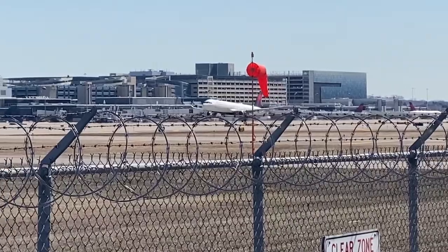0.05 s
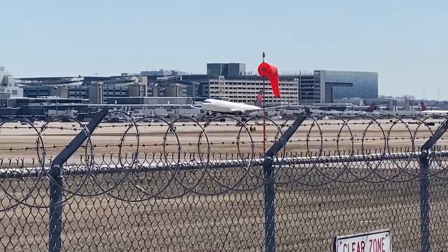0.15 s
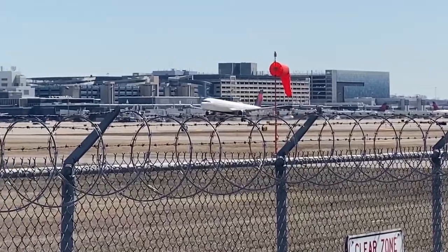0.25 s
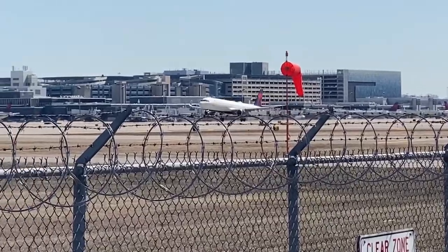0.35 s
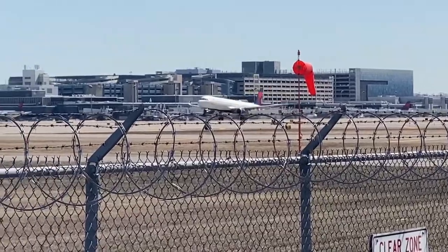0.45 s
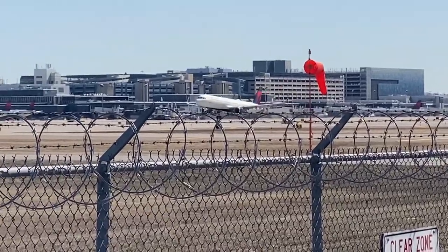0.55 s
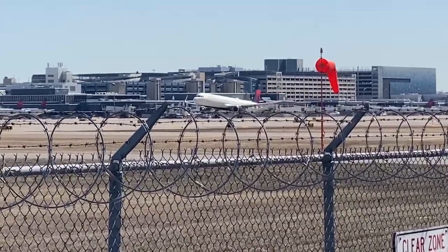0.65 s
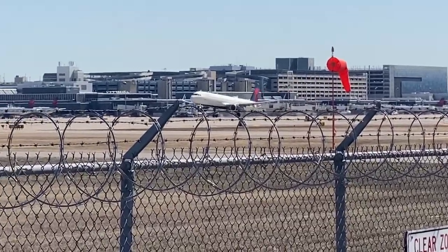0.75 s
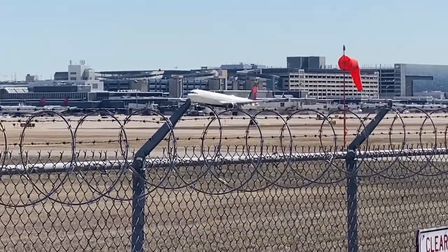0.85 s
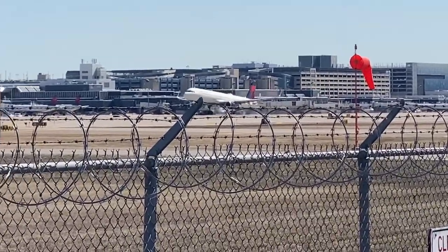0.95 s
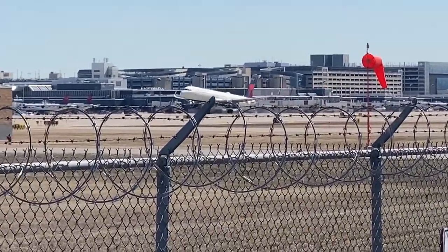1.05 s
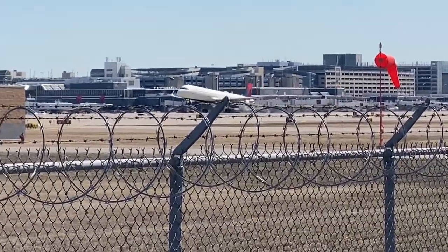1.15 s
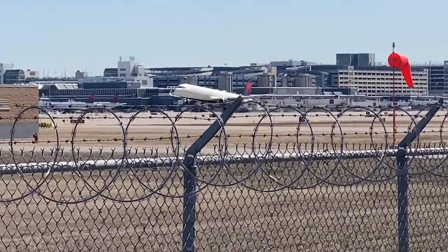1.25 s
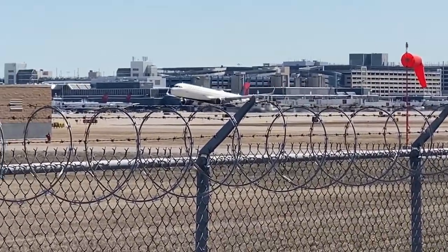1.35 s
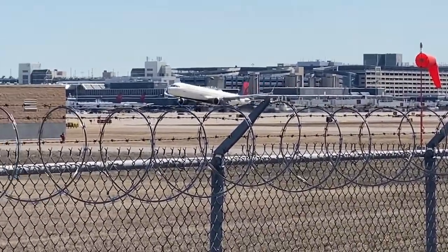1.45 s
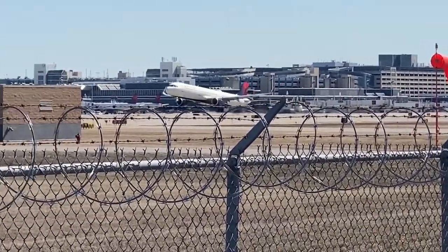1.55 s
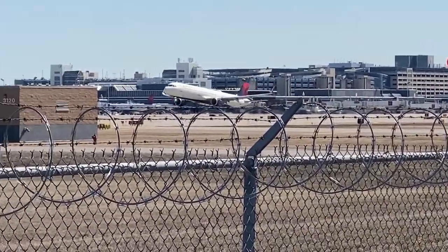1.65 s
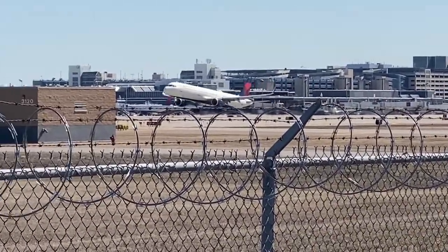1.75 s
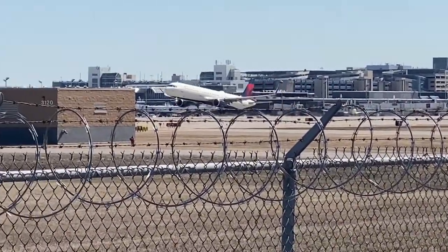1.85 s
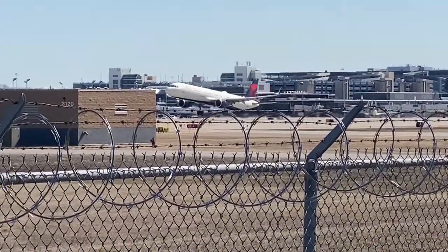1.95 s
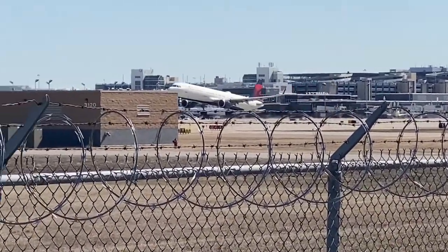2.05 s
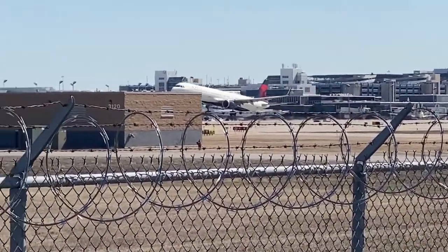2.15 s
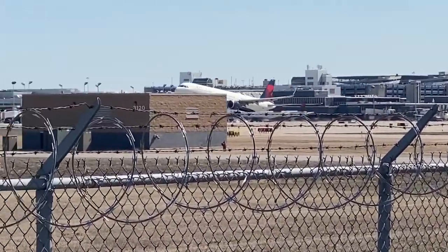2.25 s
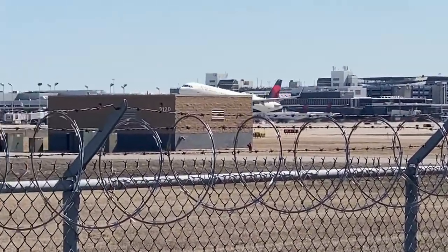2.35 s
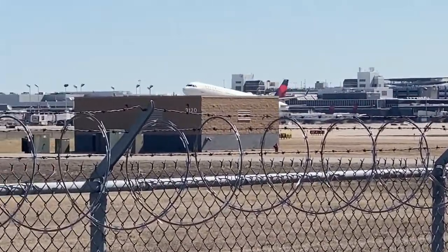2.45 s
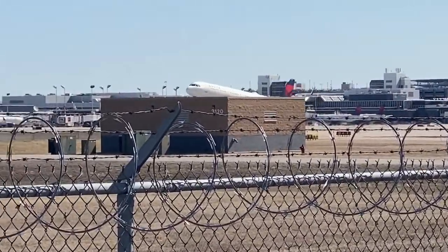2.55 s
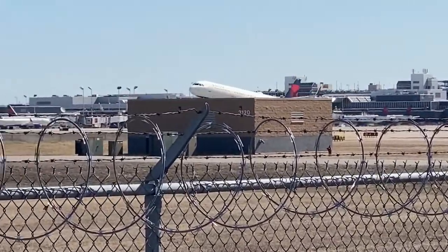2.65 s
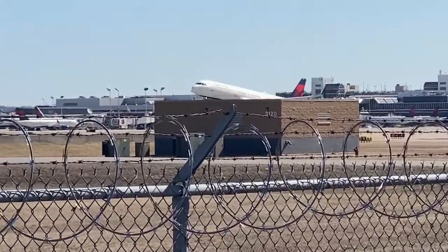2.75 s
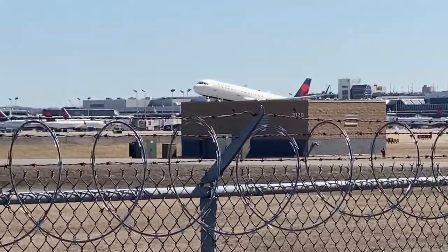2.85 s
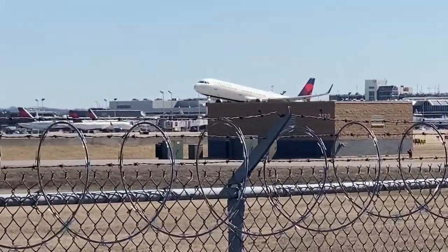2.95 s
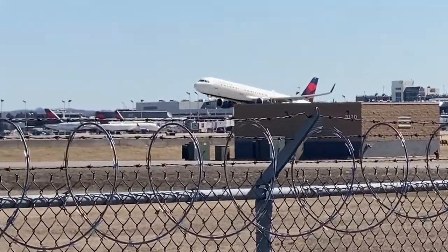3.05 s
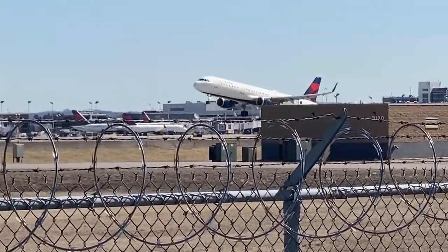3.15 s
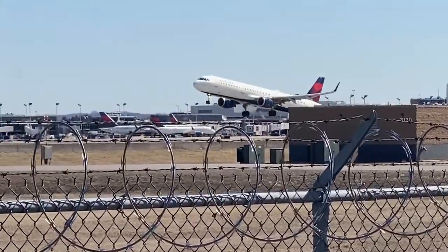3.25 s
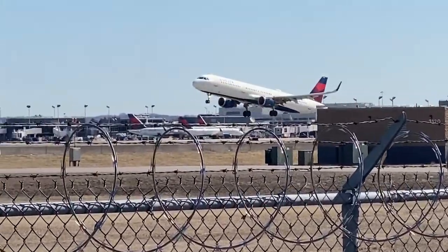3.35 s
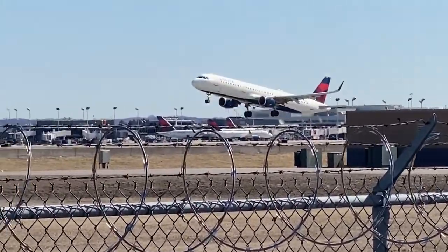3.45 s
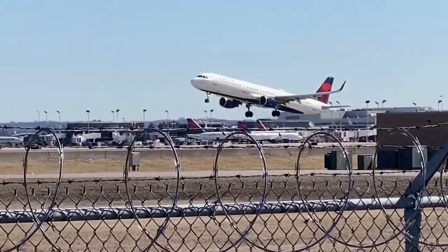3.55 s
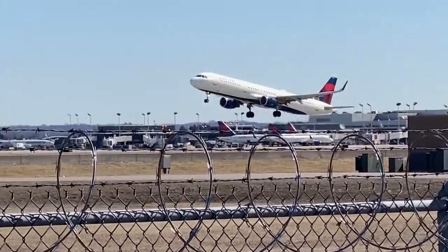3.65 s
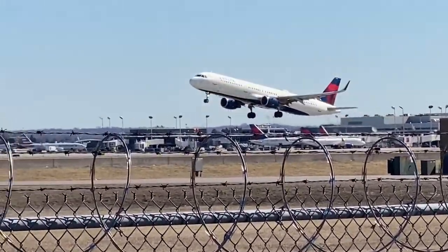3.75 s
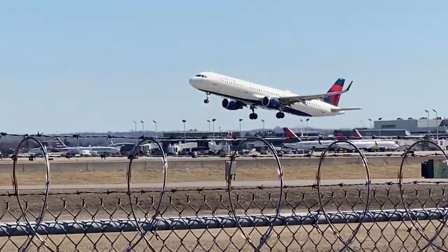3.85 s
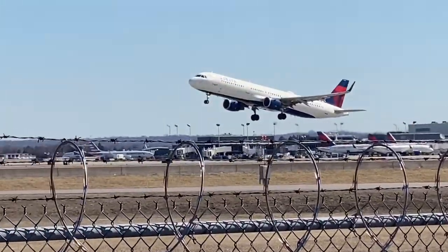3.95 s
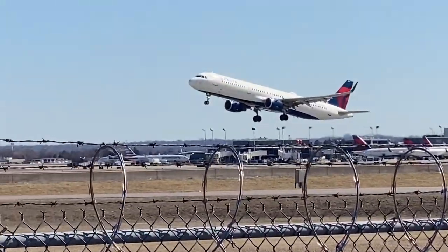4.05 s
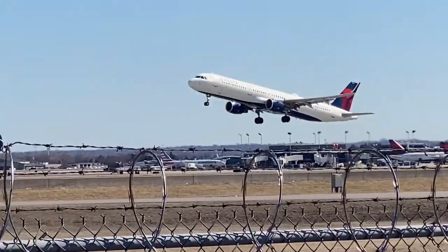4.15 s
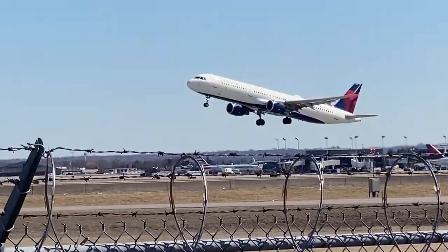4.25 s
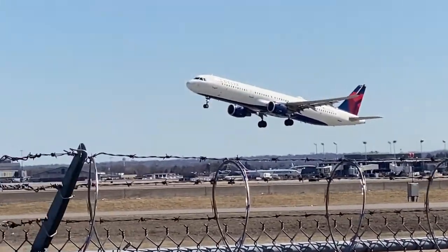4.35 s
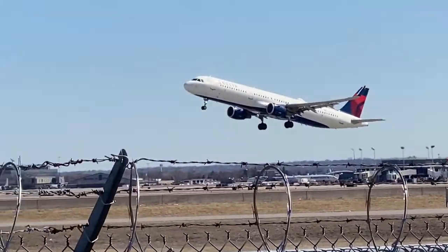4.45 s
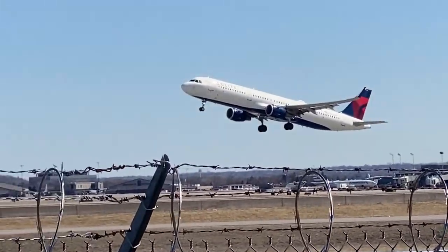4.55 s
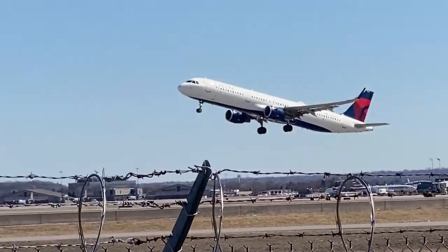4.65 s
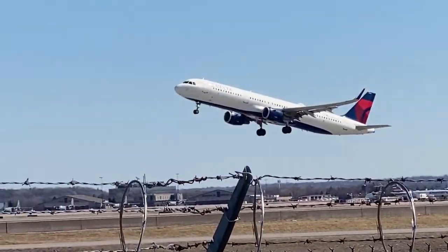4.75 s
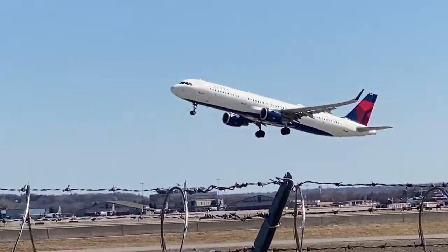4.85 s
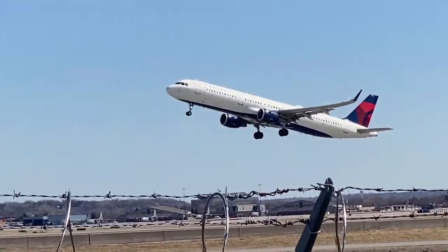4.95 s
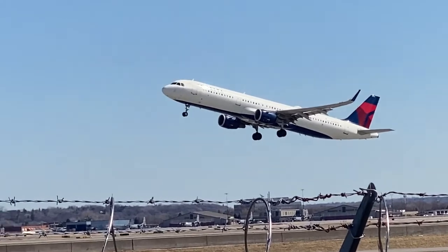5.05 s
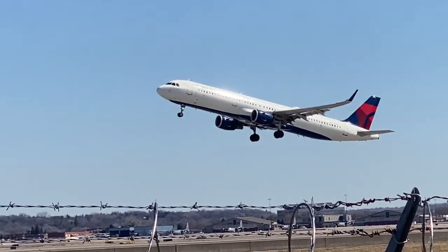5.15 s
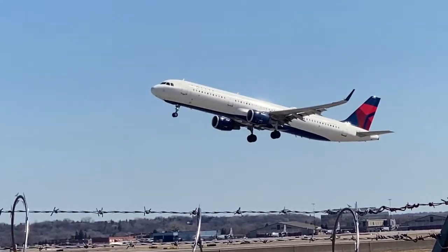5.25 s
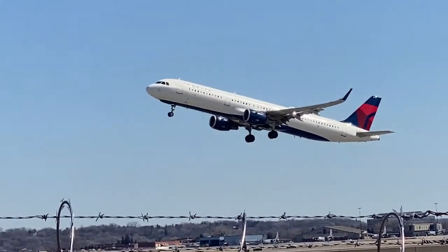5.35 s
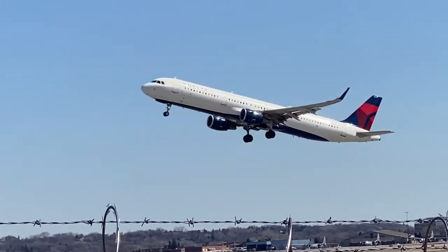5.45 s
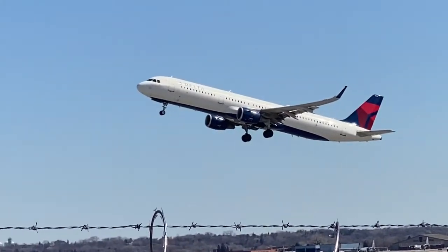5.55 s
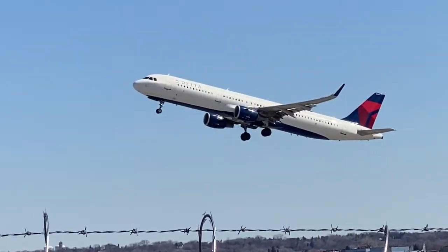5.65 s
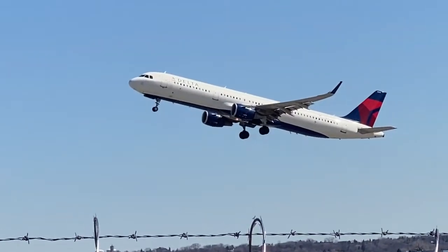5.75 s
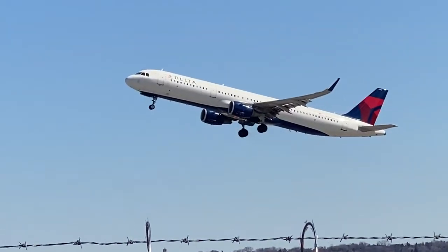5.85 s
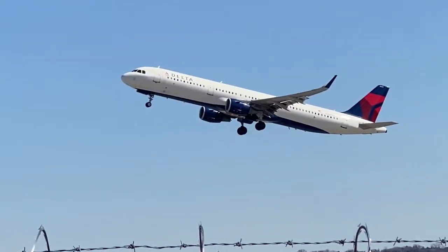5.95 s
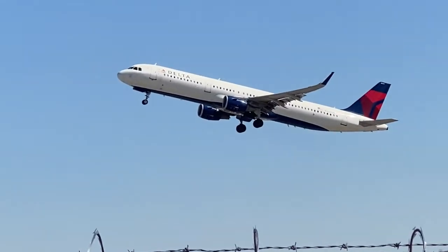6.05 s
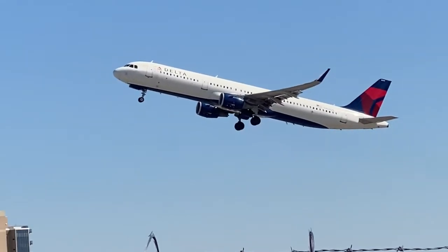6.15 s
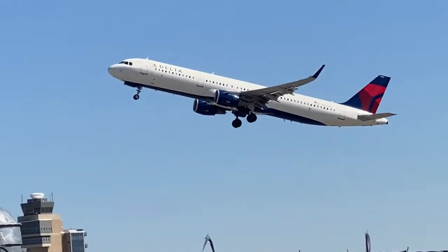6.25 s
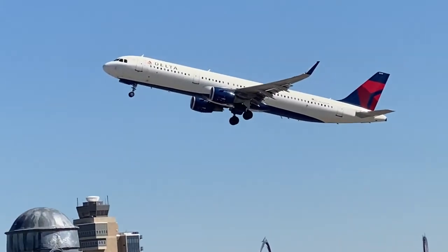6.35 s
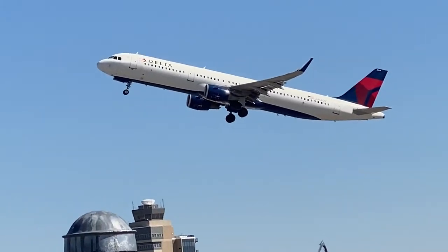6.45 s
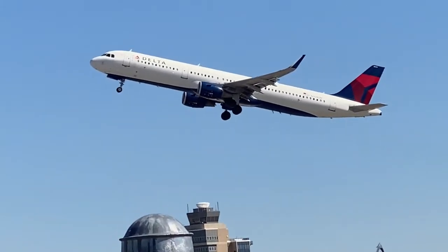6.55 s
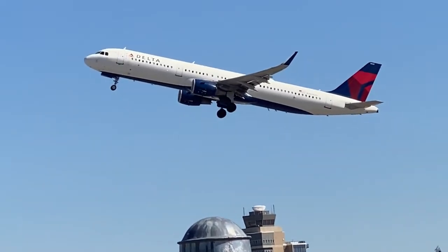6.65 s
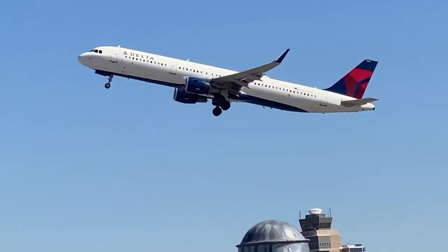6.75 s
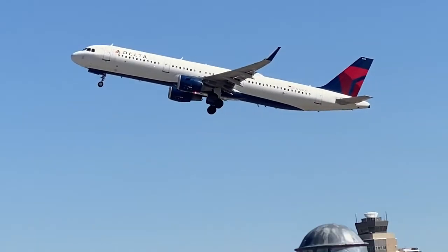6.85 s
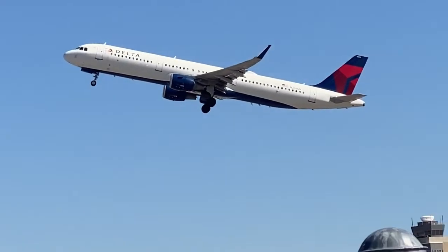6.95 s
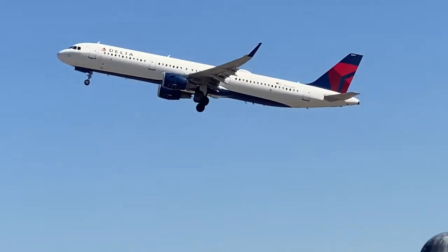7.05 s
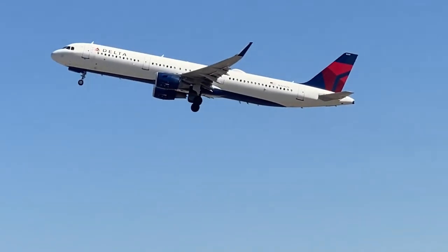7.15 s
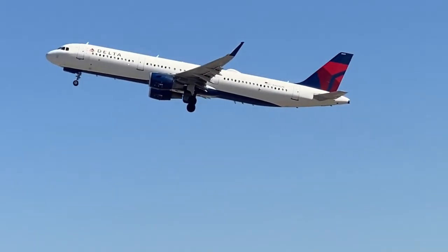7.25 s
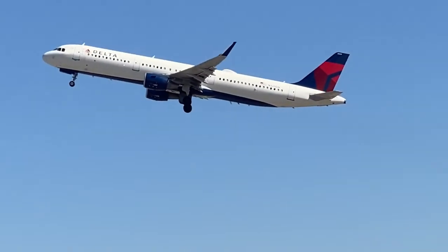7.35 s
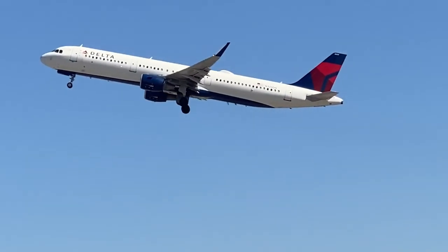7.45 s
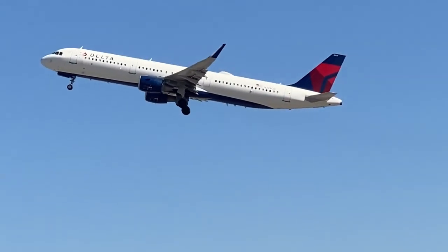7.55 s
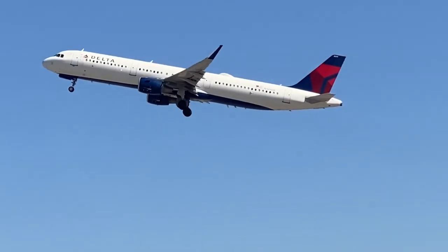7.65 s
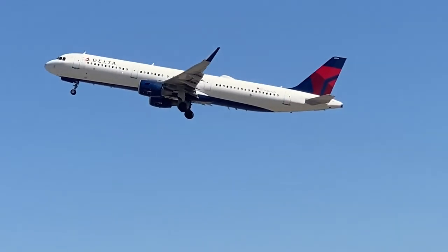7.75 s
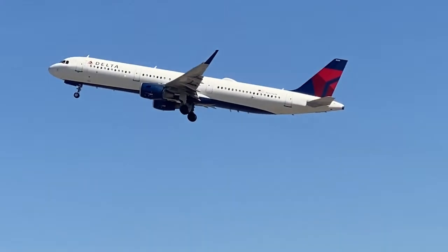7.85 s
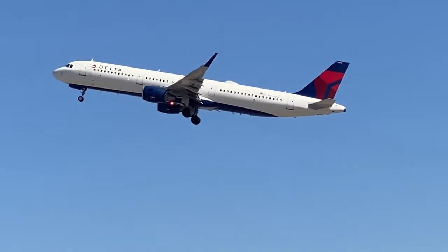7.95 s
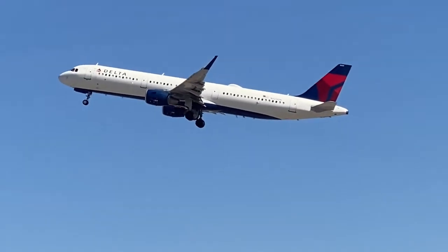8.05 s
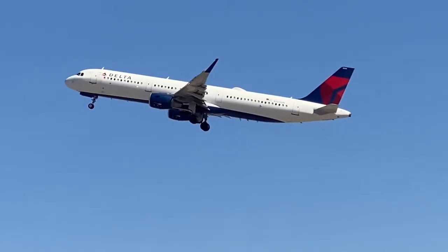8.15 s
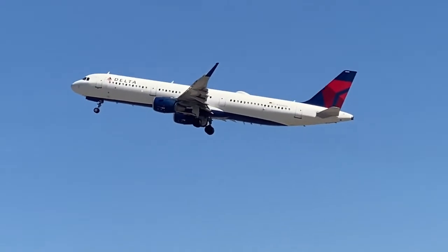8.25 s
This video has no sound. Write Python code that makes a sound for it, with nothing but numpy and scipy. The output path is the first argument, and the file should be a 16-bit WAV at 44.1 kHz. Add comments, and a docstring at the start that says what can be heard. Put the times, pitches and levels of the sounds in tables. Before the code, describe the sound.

A twin-engine jet airliner takes off across an airfield, its distant rumble swelling into a huge roar with a falling fan whine, while an engine knocks nearby.

```python
"""A twin-jet airliner lifts off far across an airfield and passes two microphone ports at the fence.
Its rumble, roar, shear and fan rush are coloured noise; buzz, blade whine, drone and a brief hum are sines.
Fan tones slide down in pitch with the jet's motion; a narrow noise band hazes the octave of the whine.
All around lies a wide wash of traffic noise with a thin, patchy hiss.
Leaning right, an engine knocks ever faster: uneven pulses that ring damped sines."""
import sys
import numpy as np
from scipy import signal
from scipy.io import wavfile
from scipy.ndimage import uniform_filter1d

SR = 44100
rng = np.random.default_rng(int(sys.argv[2]) if len(sys.argv) > 2 else 0)


def output_pcm(signal):
    """Save a mono or channel-first signal as 16-bit PCM at the path in sys.argv[1].

    Samples are clipped to [-1, 1] before scaling.
    """
    pcm = np.clip(np.atleast_2d(signal).T, -1, 1) * 32767
    wavfile.write(sys.argv[1], SR, np.round(pcm).astype(np.int16))


N = 366030
FRAMES, BINS = N // 256 + 5, np.fft.rfftfreq(1024, 1 / SR)
TIMES, CLOCK = np.arange(FRAMES) * 256 / SR, np.arange(N) / SR  # seconds of each frame, of each sample

# All levels are those ahead of the microphone's bass cut and band limit.
# Traffic and idling engines, spread wide. Each row: frequency in Hz, relative density in dB per Hz.
FIELD_COLOUR = [(100, -36), (340, -9), (430, -22), (535, 3.5), (590, -14), (640, -9), (1300, -9),
                (1500, -19), (1750, -17), (2000, -28.5), (2600, -35.5), (3450, -45), (8000, -63),
                (15000, -72)]
# Level of that wash, ahead of its drift. Each row: time in seconds, level in dB.
FIELD_LEVEL = [(0, -45.5), (1, -45), (2, -41.5), (3, -41.5), (4, -41), (5, -51.5), (8.3, -34)]
# Thin hiss of the passing engine. Each row: time in seconds, level in dB.
HISS_LEVEL = [(.8, -100), (1.5, -88), (3, -80), (4.1, -79.5), (4.6, -92)]
# Likeness of the field at the two ports. Each row: frequency in Hz, correlation.
FIELD_SAME = [(300, 0.25), (1200, -0.35), (4000, 0.81), (9000, .6)]
# Lean of the field. Each row: frequency in Hz, left minus right in dB.
FIELD_TILT = [(700, -1.0), (1300, -5.5), (1950, 11.0), (3000, -0.5)]

# Pace of the knocking engine. Each row: time in seconds, cycles per second.
KNOCK_PACE = [(.012, 4.75), (2.2, 5.65), (4.4, 6.97)]
# Strength of the hardest knock. Each row: time in seconds, relative peak in dB.
KNOCK_LEVEL = [(0, -41.5), (1.0, -40.5), (1.3, -39.5), (2.6, -37), (4.0, -39), (4.4, -47)]
# Six firings a cycle. Each entry: relative dB, scaled by each mode's share.
CYLINDER_PATTERN = [3.5, -18.5, -11.5, -16, -10, -18.5]
# Modes of the engine block. Each row: frequency in Hz, relative level in dB, 60 dB decay in seconds,
# left minus right in dB, share of the cylinder pattern.
BLOCK_MODES = [(1315, 3, 0.062, -24.5, 0.96), (1090, -7, 0.024, -7, 0.96), (917, -5, 0.033, -4, 0.9),
               (1620, -4.5, 0.035, 5, .3), (1727, -6, 0.038, 8, 0.27)]

# Colours of the jet noise at close range. Each row: frequency in Hz, relative density in dB per Hz.
RUMBLE_COLOUR = [(15, -14), (41, 2), (65, 9.5), (80, 6.5), (113, 4.5), (150, 1), (192, -2.5), (300, -12),
                 (600, -48), (2000, -120)]
ROAR_COLOUR = [(40, -73), (120, -24), (220, -1.5), (350, 3), (529, -2), (700, -14.5), (1200, -54),
               (3000, -120)]
SHEAR_COLOUR = [(200, -59), (500, -12), (700, 0.5), (800, -1.5), (960, 1), (1250, -6.5), (1600, -5.5),
                (4000, -100)]
RUSH_COLOUR = [(300, -60), (900, -7), (1390, -3), (1580, -2), (1750, -1.5), (2050, 0), (2400, -6),
               (2600, -6.5), (3450, -12), (4500, -20.5), (6000, -21.5), (8000, -27.5), (9000, -30),
               (12000, -29), (15000, -45.5)]
# Slow levels of the exhaust. Each row: time in seconds, rumble in dB, roar in dB, shear in dB,
# the last two ahead of their share of the swells.
EXHAUST_LEVEL = [(0, -35.5, -42, -57.5), (1.5, -30, -40, -49.5), (2.4, -25.5, -37, -45),
                 (2.9, -25, -35, -45.5), (3.4, -21, -32.5, -41), (3.9, -24.5, -36.5, -42.5),
                 (4.3, -20.5, -31.5, -39.5), (5.1, -20, -24.5, -32.5), (5.55, -21, -25.5, -30),
                 (6.05, -20.5, -18, -21.5), (6.6, -20, -15.5, -25), (7.0, -18.5, -17, -28.5),
                 (7.4, -17, -15.5, -23.5), (7.9, -17.5, -16, -27.5), (8.3, -16.5, -15.5, -24)]
# Fan rush, swelling and sagging as the air carries it well or badly, ahead of air loss and gusts.
# Each row: time in seconds, level in dB.
RUSH_LEVEL = [(0, -67.5), (3.9, -47.5), (4.55, -41.5), (4.8, -36), (5.05, -27), (5.25, -32), (5.42, -29),
              (5.65, -30.5), (5.76, -28), (5.8, -24.5), (5.93, -25.5), (6.05, -22), (6.2, -24.5),
              (6.33, -28.5), (6.45, -24.5), (6.6, -30), (6.85, -27.5), (7.05, -31.5), (7.2, -31),
              (7.58, -32), (7.9, -35.5), (8.03, -34.5), (8.15, -30.5), (8.3, -28.5)]
# Treble eaten by the air. Each row: time in seconds, strength in dB ahead of the frequency curve.
AIR_LOSS = [(0, 7), (4.45, 13.5), (4.72, 10.5), (4.95, 13.5), (5.7, 10.5), (5.8, 11), (6.2, 10.5), (7.2, 6),
            (8.3, 4)]
# Shifts of the rumble and of the roar along the spectrum. Each row: time in seconds, frequency factor.
RUMBLE_REACH = [(0, 0.75), (1.5, 0.77), (2.5, 1.07), (3.7, 1.35), (5, 0.9), (6.5, 1.16), (8.3, 0.81)]
ROAR_SHIFT = [(0, 1.035), (5.0, 0.98), (6.1, 1.047), (6.8, 1.02), (7.4, 1.03), (7.9, 0.88), (8.1, 0.96),
              (8.3, 1.09)]
# Depth of the turbulent patches. Each row: frequency in Hz, rms depth in dB.
PATCH_DEPTH = [(60, 0.2), (400, 1.26), (2000, 1.1)]

# Shock waves off unequal blade tips. Each row: multiple of the shaft, relative level in dB.
BUZZ_LINES = [(9, 3), (10, 5), (11, -2), (13, 1), (14, 2), (15, 2.5), (16, 4), (17, 2.5), (19, 1.5),
              (20, 2.5), (21, 0), (22, 5), (23, 6), (24, 5), (25, 0.5), (26, 2.5), (27, 2), (28, 2),
              (29, 5.5), (30, 3.5), (31, 4), (32, 2.5), (34, 6.5), (38, 4.5), (40, 4.5)]
# Buzz as the intakes face the fence. Each row: time in seconds, relative level in dB.
INTAKE_LEVEL = [(0, -15), (2.8, -9), (3.9, 0), (5.3, 0), (5.9, -2), (6.8, -4), (8.3, -11)]
# The same for the low multiples, which arrive and leave earlier.
# Each row: time in seconds, relative level in dB.
LOW_INTAKE_LEVEL = [(0, -7), (2.2, 0), (4.3, -1), (5.1, -2), (5.9, -7), (8.3, -12)]
# Blade-passing tone, coming and going as the air bends its path. Each row: time in seconds, level in dB.
WHINE_LEVEL = [(3.6, -77.5), (4.7, -58), (5.0, -45.5), (5.22, -47), (5.42, -32.5), (5.55, -43), (5.7, -45),
               (5.8, -27), (5.92, -46), (5.98, -25), (6.08, -23), (6.18, -25.5), (6.22, -42), (6.27, -27),
               (6.4, -36), (6.44, -34.5), (6.74, -31.5), (6.82, -39), (6.87, -32.5), (7.0, -37.5),
               (7.06, -43), (7.16, -37), (7.3, -43), (8.3, -57)]
# Its octave, in shorter bursts. Each row: time in seconds, level in dB.
OCTAVE_LEVEL = [(3.2, -83), (4.3, -71), (4.72, -68), (4.8, -52), (4.86, -59), (4.92, -55), (4.98, -58),
                (5.03, -44), (5.1, -57), (5.15, -61), (5.45, -53.5), (5.77, -60), (5.86, -41.5),
                (5.95, -52), (6.03, -52), (6.18, -48.5), (6.3, -57), (6.38, -46.5), (6.58, -61),
                (6.66, -46), (6.7, -59), (6.74, -38.5), (6.82, -51), (6.9, -46), (6.98, -68), (7.05, -50),
                (7.2, -55), (7.5, -47.5), (7.8, -59), (8.05, -54), (8.25, -44)]
# The octave smeared into a band by far-off turbulence. Each row: time in seconds, level in dB.
HAZE_LEVEL = [(0, -84), (1.2, -83), (1.5, -73.5), (2.6, -73.5), (3.0, -78.5), (4.4, -78), (4.7, -72),
              (5.0, -100)]

# Likeness of the jet at the two ports. Each row: frequency in Hz, correlation.
JET_SAME = [(60, 1), (340, 1), (530, 1), (810, 0.86), (1150, 0.93), (1500, 0.85), (1750, 0.86),
            (2100, 0.99), (3000, 0.92), (5000, 1), (8000, 0.17)]
# Phase between the ports. Each row: frequency in Hz, radians by which left leads.
JET_LEAD = [(40, -0.04), (250, -0.13), (430, -0.12), (1210, -0.5), (1460, 0.51), (1720, -1.63),
            (1980, -0.36), (2240, 0.56), (3190, 0.5)]
# Lean of the jet. Each row: frequency in Hz, left minus right in dB.
JET_TILT = [(60, 0.5), (130, -1.5), (290, -0.5), (630, 0), (1370, -1.5), (3000, -0.5)]

# straight path past the fence: turns per s, moment abreast s, speed there m/s, gain of speed m/s2
FAN_TURNS, ABREAST_S, SPEED, PUSH = 83.12, 7.223, 114.09, 6.143
NEAREST_M, SOUND_SPEED = 465.4, 343  # metres, m/s
BLADES, LOW_TOP = 18, 10  # fan blades, highest low multiple of the buzz
DRONE_ORDER, DRONE_DB = 4, -52  # multiple of the shaft, level
HUM_HZ, HUM_DB, HUM_START_S, HUM_END_S = 197, -32.5, 1.98, 2.39
HUM_RISE, HUM_FALL = 0.004, .004  # seconds per dB outside the hum's ends
# share of each swell of the rush, in dB, passed on to the other sounds and taken off the air loss
ROAR_SHARE, SHEAR_SHARE, LOSS_SHARE = 0.46, 0.4, 0.38
SWELL_S = 1  # swells are counted from the mean over this time
BASS_HZ, EDGE_HZ = 48.7, 14800  # microphone's bass cut, upper band limit


def gain_of(db):
    """Decibels to amplitude."""
    return 10 ** (np.asarray(db) / 20)


def evened(x):
    """Scales to rms 1."""
    return x / np.sqrt(np.mean(abs(x) ** 2) + 1e-20)


def read(points, hz):
    """A spectrum table at the given frequencies, interpolated over log frequency."""
    f, value = np.transpose(points)
    return np.interp(np.log(hz + 1), np.log(f + 1), value)


def follow(rows, t):
    """Every column of a curve table at the times t."""
    s, *columns = np.transpose(rows)
    return [np.interp(t, s, c) for c in columns]


def drift(hz):
    """Slow chance of rms 1, one value a frame: sines of random phase up to hz."""
    return evened(sum(np.sin(2 * np.pi * (f * TIMES + rng.random())) / np.sqrt(f)
                      for f in np.geomspace(hz / 10, hz, 20)))


def drift_by_sample(hz):
    """The same slow chance, one value a sample."""
    return np.interp(CLOCK, TIMES, drift(hz))


def static():
    """Complex noise, bins x frames, that gives rms 1 under a colour of rms 1."""
    a, b = rng.standard_normal((FRAMES, len(BINS), 2)).T
    return (a + 1j * b) * np.sqrt(3 / 2 / len(BINS))


def spectra(x):
    """Short-time spectra of a signal."""
    padded = np.pad(x, (0, 2048), "reflect")
    return signal.stft(padded, nperseg=1024, noverlap=768)[2][:, :FRAMES]


def waves(z):
    """Signal of short-time spectra."""
    return signal.istft(z, nperseg=1024, noverlap=768)[1][..., :N]


def tone(hz, flicker_db, flicker_hz):
    """A sine on a pitch curve, its level shaken by the air on the way."""
    shake = gain_of(flicker_db * drift_by_sample(flicker_hz))
    turns = np.cumsum(hz) / SR + rng.random()
    return np.sqrt(2) * evened(shake) * np.sin(2 * np.pi * turns)


def airfield():
    """Wide wash of changing level and a patchy hiss, only partly alike at the two ports."""
    wash_db = follow(FIELD_LEVEL, TIMES)[0] + 0.53 * drift(5.7)
    wash = evened(gain_of(read(FIELD_COLOUR, BINS)))[:, None] * gain_of(wash_db)
    # three treble bands that rise and fall apart
    bands = sum(np.exp(-.5 * ((BINS[:, None] - hz) / 450) ** 2) * gain_of(2.5 * drift(12))
                for hz in (5500, 6400, 7700))
    hiss = evened(bands) * gain_of(follow(HISS_LEVEL, TIMES)[0])
    colour = np.hypot(wash, hiss)
    same = np.clip(read(FIELD_SAME, BINS), -1, 1)[:, None]
    right, other = static(), static()
    tilt = gain_of(read(FIELD_TILT, BINS))[:, None]
    left = tilt * (same * right + np.sqrt(1 - same ** 2) * other)
    return waves(colour * np.array([left, right]))


def knocking():
    """Six uneven knocks a cycle, each ringing the damped modes of the engine block."""
    running = CLOCK[(CLOCK >= KNOCK_PACE[0][0]) & (CLOCK < KNOCK_PACE[-1][0])]
    turns = np.cumsum(follow(KNOCK_PACE, running)[0]) / SR
    starts = np.interp(np.arange(int(turns[-1]) + 1), turns, running)
    cycle_s = np.gradient(starts)
    hard_db = follow(KNOCK_LEVEL, starts)[0] + 1.4 * rng.standard_normal(len(starts))
    blows, out = np.zeros(N), np.zeros((2, N))
    t = np.arange(4000) / SR
    swell = np.sin(np.pi / 2 * np.minimum(t / .014, 1)) ** 2  # the block takes a moment to sound
    for hz, mode_db, t60, left_db, share in BLOCK_MODES:
        uneven_db = 3.5 * rng.standard_normal((len(starts), len(CYLINDER_PATTERN)))
        for k, soft_db in enumerate(CYLINDER_PATTERN):
            at = np.int_((starts + k / len(CYLINDER_PATTERN) * cycle_s) * SR)
            # the first knock of a cycle has no added unevenness
            blows[at] = gain_of(hard_db + share * soft_db + uneven_db[:, k] * (k > 0))
        ring = swell * gain_of(mode_db + 7.0 - 60 * t / t60) * np.sin(2 * np.pi * hz * t)
        rung = signal.oaconvolve(blows, ring)[550:N + 550]  # knock times mark the peak
        out += gain_of([[left_db], [0]]) * rung
    return out


def shaft_heard(t):
    """Fan turns per second as heard: Doppler raises them while the jet nears, lowers them once past."""
    since = t - ABREAST_S
    along = SPEED * since + PUSH * since ** 2 / 2
    receding = (SPEED + PUSH * since) * along / np.hypot(along, NEAREST_M)
    return FAN_TURNS / (1 + receding / SOUND_SPEED)


def swells():
    """The quick ups and downs of the fan rush in dB, one value a frame."""
    rush_db = follow(RUSH_LEVEL, TIMES)[0]
    return rush_db - uniform_filter1d(rush_db, round(SWELL_S / TIMES[1]), mode="nearest")


def jet_colour():
    """Four noise layers on their levels; air eats the treble, turbulence makes gusts and patches."""
    rumble_db, roar_db, shear_db = follow(EXHAUST_LEVEL, TIMES)
    swell_db = swells()
    rush_db = follow(RUSH_LEVEL, TIMES)[0]
    loss_db = follow(AIR_LOSS, TIMES)[0] - LOSS_SHARE * swell_db
    # loss grows faster than pitch, counted from the rush, and levels off at the top
    air_db = -loss_db * (4.14 * np.tanh((BINS[:, None] / 4000) ** 1.5 / 2.29) - .35)
    gusts_db = 1.05 * drift(75) * np.clip(BINS / 3000, 0, 1.5)[:, None]  # the treble flutters most
    patches = rng.standard_normal((FRAMES, len(BINS))).T
    patches = uniform_filter1d(patches, 14, 0)
    patches = evened(uniform_filter1d(patches, 12, 1))
    layers = []
    for shape, factor, db in (
            (RUMBLE_COLOUR, RUMBLE_REACH, rumble_db),
            (ROAR_COLOUR, ROAR_SHIFT, roar_db + ROAR_SHARE * swell_db)):
        low = gain_of(read(shape, BINS[:, None] / follow(factor, TIMES)[0]))
        layers.append(low / np.sqrt((low ** 2).mean(0)) * gain_of(db))
    for shape, db in (
            (SHEAR_COLOUR, shear_db + SHEAR_SHARE * swell_db + gusts_db),
            (RUSH_COLOUR, rush_db + air_db + gusts_db)):
        layers.append(evened(gain_of(read(shape, BINS)))[:, None] * gain_of(db))
    patch_gain = gain_of(read(PATCH_DEPTH, BINS)[:, None] * patches)
    return np.sqrt(sum(layer ** 2 for layer in layers)) * patch_gain


def hazy_whine():
    """Noise colour in a narrow band around the octave of the blade tone."""
    centre = 1.01 * 2 * BLADES * shaft_heard(TIMES)
    band = np.exp(-.5 * ((BINS[:, None] - centre) / 125) ** 2)
    level_db = follow(HAZE_LEVEL, TIMES)[0] + 2.6 * drift(14)
    return band / np.sqrt((band ** 2).mean(0)) * gain_of(level_db)


def buzz(shaft):
    """Shaft multiples of both fans, the far one fainter and a little faster, against noise of rms 1."""
    twin = 1.002 * shaft
    low_db, high_db = follow(LOW_INTAKE_LEVEL, CLOCK)[0], follow(INTAKE_LEVEL, CLOCK)[0]
    out = np.zeros(N)
    for k, db in BUZZ_LINES:
        intake_db = low_db if k <= LOW_TOP else high_db
        both = tone(k * shaft, 4.5, 25) + gain_of(-4) * tone(k * twin, 4.5, 25)
        out += gain_of(-30.5 + db + intake_db) * both
    return out


def whine(shaft):
    """Sines for the blade-passing tone, its octave, a low drone and the brief wavering hum."""
    outside = np.maximum((HUM_START_S - CLOCK) / HUM_RISE, (CLOCK - HUM_END_S) / HUM_FALL)
    hum_db = HUM_DB - np.maximum(outside, 0)
    waver = shaft * (1 + .003 * drift_by_sample(50))
    first = tone(BLADES * waver, 1.5, 40)
    octave = tone(2 * BLADES * waver, 3.5, 70)
    hum = tone(HUM_HZ + 2.5 * drift_by_sample(15), 1.5, 25)
    drone = tone(DRONE_ORDER * shaft, 1.9, 8.6)
    # both tones start from near silence
    first_db, octave_db = (follow([(2.8, -110)] + list(rows), CLOCK)[0]
                           for rows in (WHINE_LEVEL, OCTAVE_LEVEL))
    return (gain_of(first_db) * first + gain_of(octave_db) * octave
            + gain_of(hum_db) * hum + gain_of(DRONE_DB) * drone)


def airliner():
    """All jet sound through two microphone ports: mostly alike, shifted in phase and level."""
    shaft = shaft_heard(CLOCK)
    colour, haze, tones = jet_colour(), hazy_whine(), spectra(whine(shaft))
    same = np.clip(read(JET_SAME, BINS), 0, 1)[:, None]
    shaken = shaft * (1 + .002 * drift_by_sample(25))
    direct, lines, scattered = static(), spectra(buzz(shaken)), static()
    right_noise = same * direct + np.sqrt(1 - same ** 2) * scattered
    # the buzz takes the colour of the jet noise
    left = colour * (direct + lines) + haze * direct + tones
    right = colour * lines + tones + (colour + haze) * right_noise
    # half of the lean and lead on each side
    port = (gain_of(read(JET_TILT, BINS) / 2) * np.exp(.5j * read(JET_LEAD, BINS)))[:, None]
    return waves(np.array([left * port, right / port]))


def scene():
    """Jet, airfield wash and knocking engine."""
    return airliner() + airfield() + knocking()


def record(dry):
    """The microphone drops the deepest bass; then soft ends and the upper band limit."""
    bass_cut = signal.butter(5, BASS_HZ, "highpass", fs=SR, output="sos")
    thin = signal.sosfilt(bass_cut, dry)
    thin = thin * np.minimum(np.minimum(CLOCK, CLOCK[::-1]) / .004, 1)  # 4 ms fades
    thin = np.pad(thin, ((0, 0), (255, 255)), "reflect")
    band_limit = signal.firwin(511, EDGE_HZ, window=("kaiser", 9), fs=SR)
    return signal.oaconvolve(thin, band_limit[None], "valid", axes=1)


dry = scene()
out = record(dry)
output_pcm(out)
```